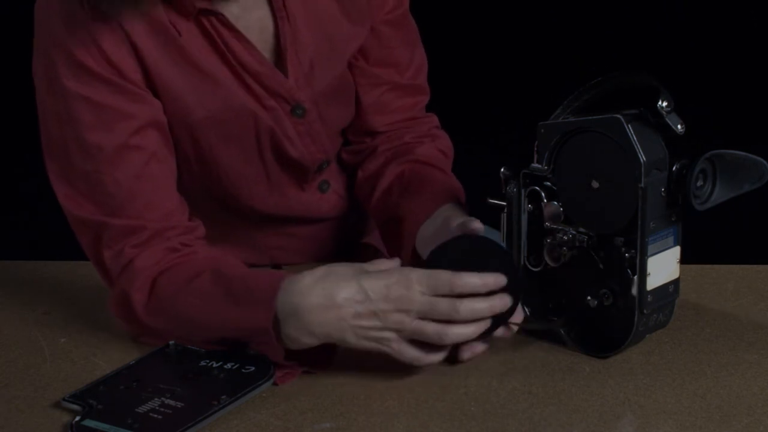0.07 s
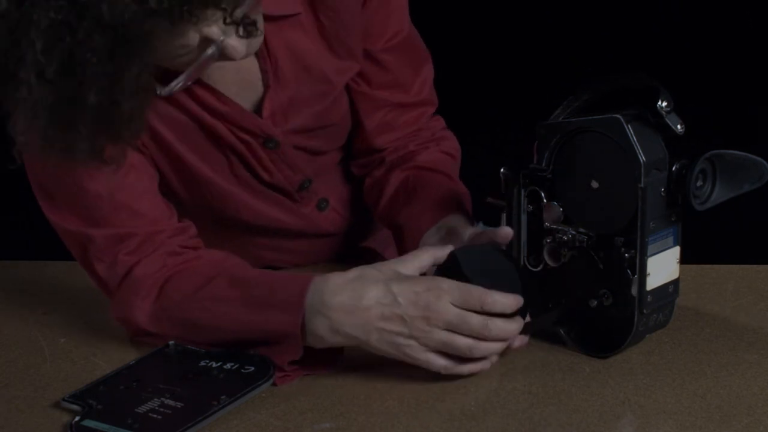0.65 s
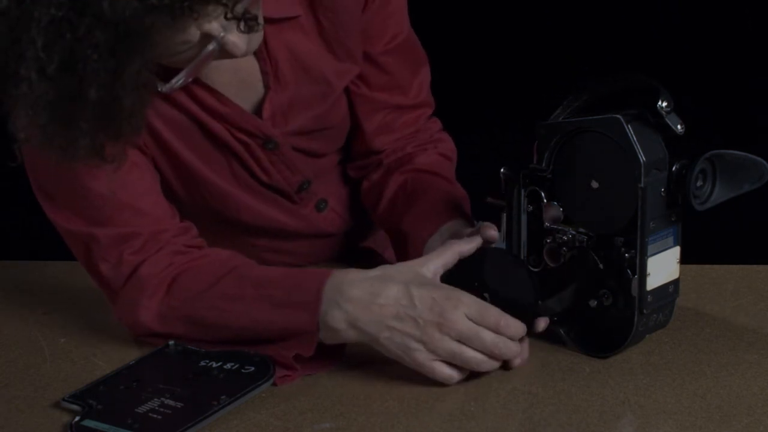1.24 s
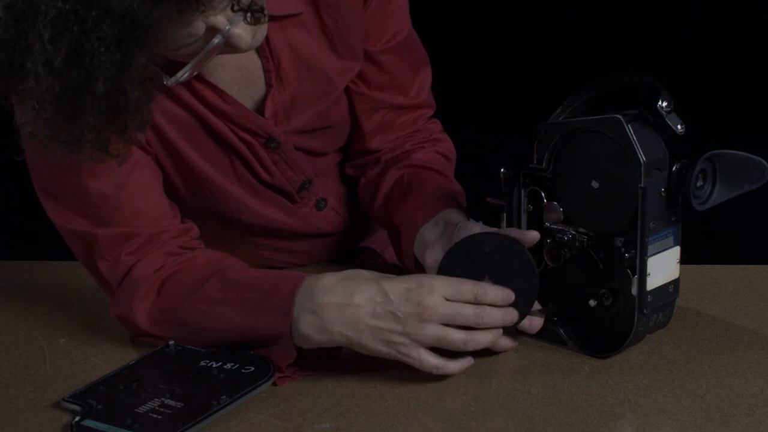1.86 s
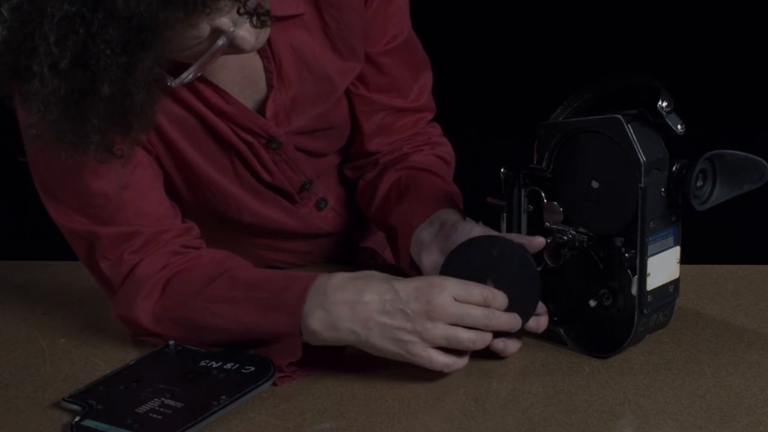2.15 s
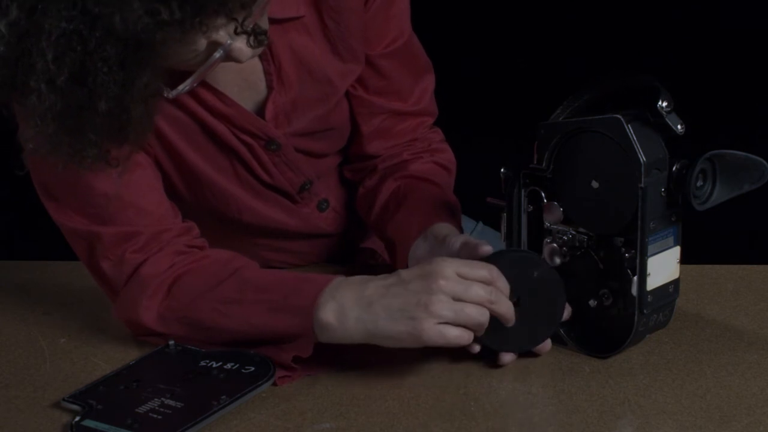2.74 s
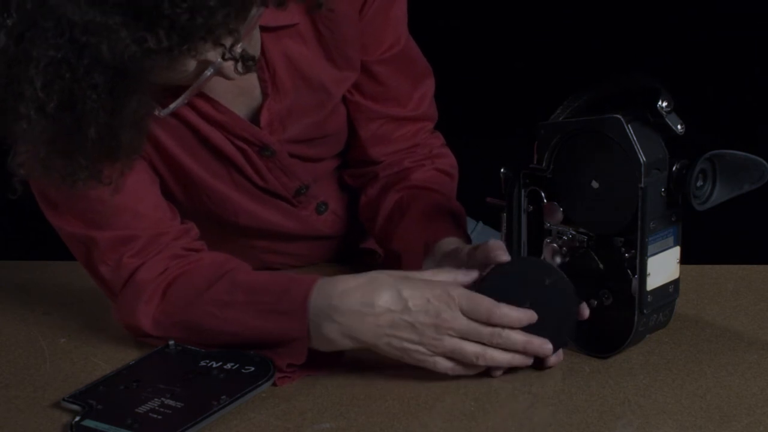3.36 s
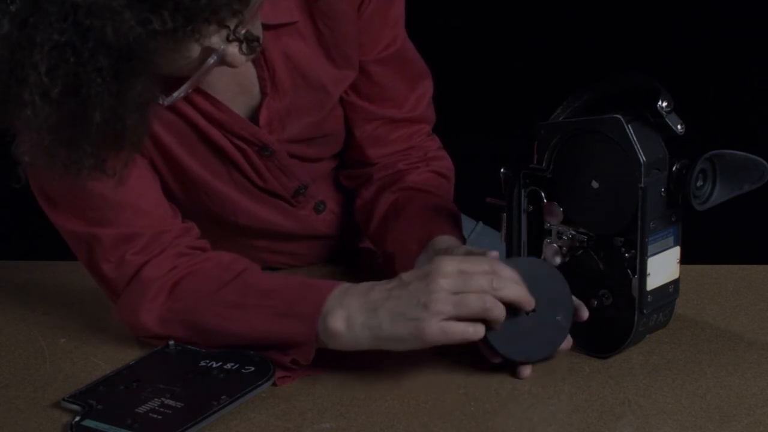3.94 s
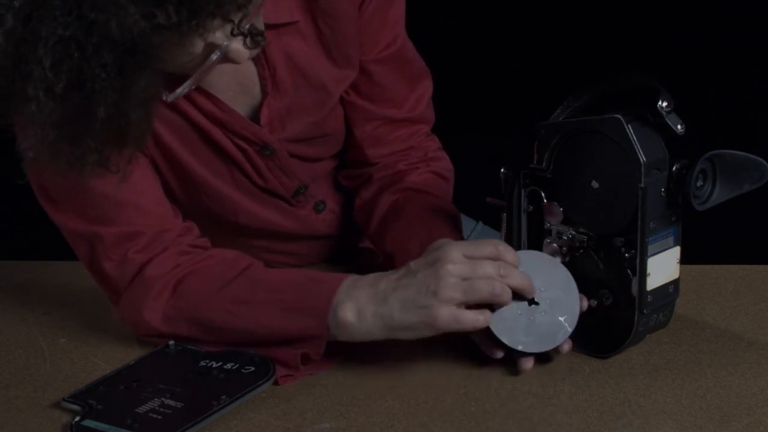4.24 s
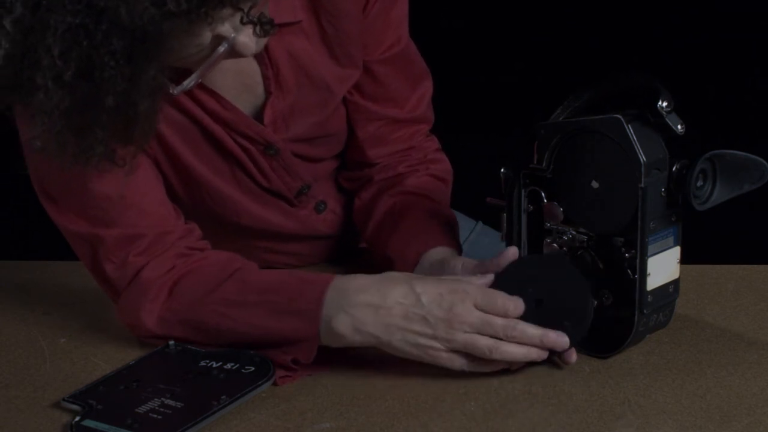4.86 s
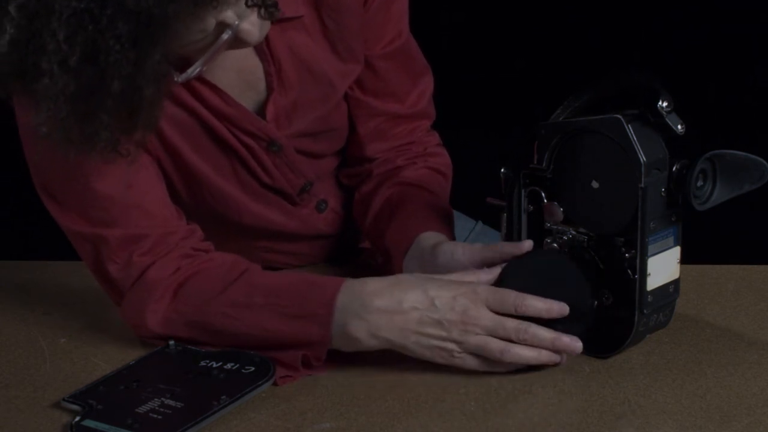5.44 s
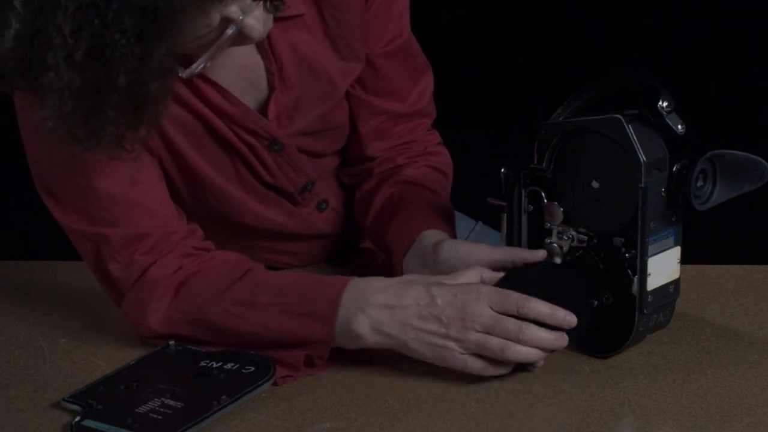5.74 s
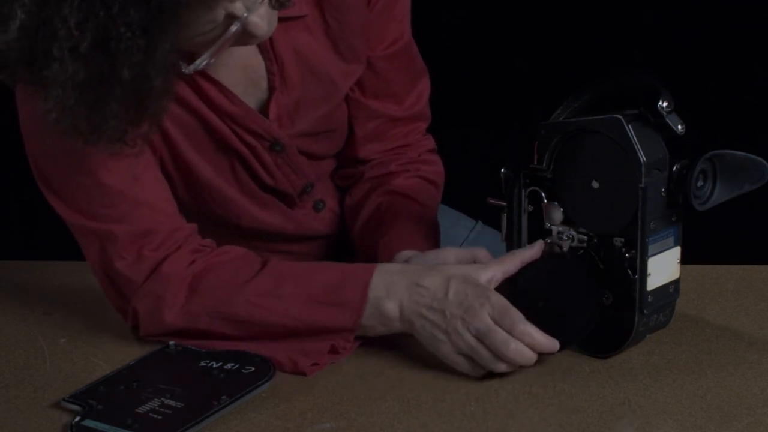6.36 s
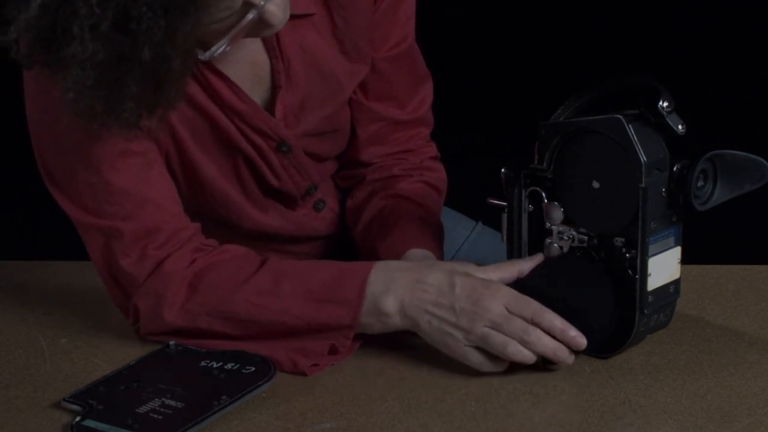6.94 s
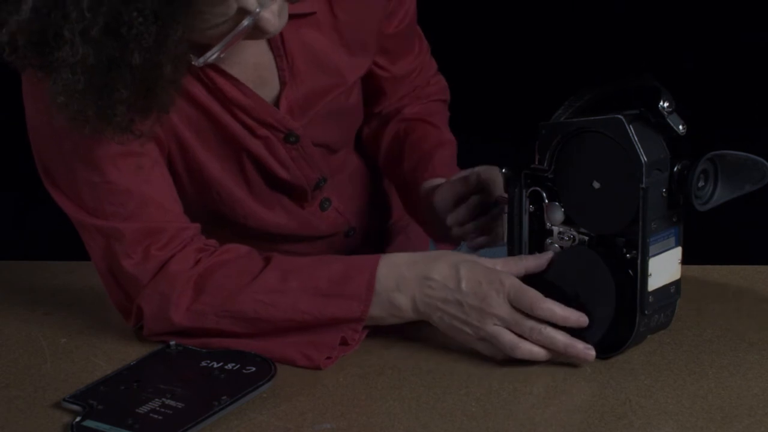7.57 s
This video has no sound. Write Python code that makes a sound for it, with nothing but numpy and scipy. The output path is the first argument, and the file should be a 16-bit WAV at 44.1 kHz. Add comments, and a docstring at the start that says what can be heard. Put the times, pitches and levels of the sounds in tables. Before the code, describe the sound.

Film is wound by hand onto a small metal spool, giving soft rubs, tiny high squeaks and light ticks as its edge flicks the rims. Near the end the spool knocks a few times against the hollow body of a film camera on a table and scrapes into place. The sounds are small and close, in a quiet room with a steady low hum and rumble of air.

```python
"""Film squeaks and rubs as hands wind it onto a metal spool, then fit the spool into a cine camera.
The tightening turns stick and slip in short chirps, and the film edge ticks against ringing flanges.
The spool then knocks and scrapes into the camera, exciting the resonances of the hollow case as it
stands on a table. Behind it all lie the hum of motors and the rumble of air in a quiet room."""
import sys
import numpy as np
from scipy import signal
from scipy.fft import rfft, irfft
from scipy.io import wavfile

SR = 44100
rng = np.random.default_rng(int(sys.argv[2]) if len(sys.argv) > 2 else 0)


def inscribe(sig):
    """Save sig as 16-bit PCM at rate SR to the path in sys.argv[1].

    A 1-D sig is mono; a 2-D sig holds one channel per row.
    Samples are clipped to [-1, 1] before scaling.
    """
    pcm = np.round(np.clip(np.atleast_2d(sig).T, -1, 1) * 32767)
    wavfile.write(sys.argv[1], SR, pcm.astype(np.int16))


N = 335102
TIME = np.arange(N) / SR

# Spectra of film contact and of finger contact. Each row: frequency in Hz, relative level in dB.
FILM_SPECTRUM = [(1000, -16), (2200, -12), (3300, -4), (4300, -0.5), (5600, 2), (7200, -1), (10000, -9.5),
                 (14500, -8), (16500, -29.5)]
FINGER_SPECTRUM = [(300, -18.5), (650, -3.5), (1200, 10), (2500, 13), (4000, 5.5), (8000, -32)]
# Modes of the hand-damped flanges and of the hollow case.
# Each row: frequency in Hz, bandwidth in Hz, relative lift in dB.
FLANGE_MODES = [(4952, 60, 7), (5330, 70, 0), (5740, 86.5, 9.5), (6970, 82, 15.5), (8820, 190, 7),
                (11080, 38, 6), (14050, 130, 9)]
CASE_MODES = [(575, 55, 11), (1840, 80, 10), (2010, 55, 11), (2860, 110, 5), (4100, 120, 4), (4860, 100, 2),
              (5520, 120, 8), (6150, 120, 3), (6950, 100, 6)]


def squeaks(edge_s=0.0035, sag_octaves_per_s=4.9, judder_hz=520, judder_db=3.8, scatter_db=0.6):
    """Stick-slip friction: film catches and lets go thousands of times a second, driving the flanges."""
    # Each row: start in seconds, length in seconds, slip rate in Hz, level in dB, unevenness from 0 to 1.
    chirps = [(0.69, 0.042, 5090, -33.0, 0.11), (0.725, 0.016, 4340, -34, 0.03),
              (0.765, 0.0067, 4160, -33.5, 0.01), (1.3137, 0.0068, 4560, -31.5, 0.13),
              (1.3253, 0.013, 4973, -34.5, 0.31), (1.428, 0.0078, 7750, -40.5, 0.04),
              (2.08, 0.0084, 5020, -49, 0.13), (2.466, 0.034, 4600, -55.5, 0.09),
              (2.7843, 0.009, 4004, -41.5, 0.04), (2.8567, 0.0068, 5340, -33, 0.1),
              (2.881, 0.0083, 5500, -31, 0.06), (2.9, 0.0051, 5930, -23.5, 0.04),
              (3.832, 0.01, 7200, -32.5, 0.5), (4.33, 0.0075, 4085, -35.5, 0.05),
              (4.34, 0.0094, 3960, -36.5, 0.07), (4.351, 0.0053, 3460, -33.5, 0.2),
              (4.364, 0.0079, 3100, -39.5, 0.06), (4.431, 0.024, 2430, -56, 0.12),
              (4.475, 0.021, 2810, -51, 0.07), (4.495, 0.011, 2880, -43.5, 0),
              (4.509, 0.0204, 2820, -46.5, 0.07), (4.534, 0.0081, 3455, -44, 0.34),
              (4.884, 0.0038, 6910, -32.5, 0.08), (4.904, 0.011, 4330, -39, 0.08),
              (5.752, 0.021, 2730, -37, 0.09), (5.78, 0.015, 2980, -42.5, 0.07),
              (5.8, 0.014, 3020, -45.5, 0.06), (5.831, 0.0091, 2550, -39, 0.11),
              (5.851, 0.014, 2984, -39, 0.09), (5.866, 0.0132, 3390, -36.5, 0.06),
              (5.89, 0.0095, 3310, -41, 0.07), (6.14, 0.012, 3600, -49.5, 0.31),
              (6.16, 0.0075, 3290, -41, 0.11), (6.47, 0.011, 4580, -37, 0.15),
              (6.838, 0.0084, 3840, -46.5, 0.07), (7.047, 0.0097, 3880, -50.5, 0.13)]
    out, spool = np.zeros(N), resonant_body(FILM_SPECTRUM, FLANGE_MODES, lift_db=-4)
    for start, length, hz, db, uneven in chirps:
        t = TIME[:int(length * SR)]
        wander, grip, grit = rng.standard_normal((3, 8192))[:, :len(t)]
        gate = np.sin(np.pi / 2 * np.minimum(np.minimum(t, length - t) / edge_s, 1)) ** 2
        uneven = np.hypot(uneven, 0.02)  # even the cleanest chirp wavers
        sag = 2 ** (sag_octaves_per_s * (length / 2 - t))  # the slip rate sinks as the pull eases
        slip_hz = hz * (1 + uneven * unit_rms(lowpass(wander, 1100))) * sag
        phase = 2 * np.pi * np.cumsum(slip_hz) / SR
        slips = sum(np.sin(k * phase) / k ** 0.52 for k in range(1, int(SR / 2 / hz) + 1))
        grip = unit_rms(lowpass(grip, 600))
        judder = np.sin(2 * np.pi * np.cumsum(judder_hz * (1 + grip / 2)) / SR)  # rough slips surge
        pressure = undb(min(uneven * 10, 1) * (scatter_db * grip + judder_db * judder))
        force = (slips + 0.45 * np.sqrt(uneven) * grit) * gate * pressure
        chirp = signal.fftconvolve(force, spool)
        add(out, start, undb(db) * chirp * np.sqrt(len(t)) / np.linalg.norm(chirp))
    # The film creeps faintly before and after it lets go.
    start, length, _, db, _ = np.transpose(chirps)
    creep_speed = strokes(start + length / 2, length + 0.014, db - 21)
    creep = friction(2000, spread_db=2.8, smooth=0.5) * creep_speed
    return out + convolve(creep, spool)


def rubs(fidget_db=4, fidget_hz=10):
    """Sliding friction: film hisses over film and excites the flanges while fingers drag on the spool."""
    # Each row: middle in seconds, length in seconds, relative treble level in dB, midrange offset in dB.
    slides = [(0.016, 0.026, -51, -19.5), (0.385, 0.076, -64, -4), (0.557, 0.033, -51, -14),
              (0.936, 0.13, -68.5, -20.5), (1.077, 0.019, -61.5, -4), (1.708, 0.018, -61.5, -16),
              (1.827, 0.0095, -55.5, -11), (1.885, 0.027, -56.5, -12), (2.236, 0.12, -77.5, -11),
              (2.531, 0.034, -47, -10), (2.621, 0.029, -48.5, -2.5), (2.833, 0.023, -57.5, -13),
              (3.122, 0.0079, -61.5, -21), (3.467, 0.031, -70.5, -15.5), (3.688, 0.018, -65.5, -0.5),
              (3.835, 0.013, -35.5, -11), (3.975, 0.062, -57.5, -8), (4.245, 0.08, -68.5, 3.5),
              (4.552, 0.0125, -53.5, -3), (4.667, 0.0156, -53, -8.5), (4.846, 0.0054, -56, -5.5),
              (5.628, 0.046, -62.5, -3), (5.67, 0.0088, -45, -22), (5.726, 0.0054, -47, -13.5),
              (6.09, 0.033, -72.5, 0)]
    # Faint rustle between the strokes. Each row: time in seconds, relative level in dB.
    rustle_levels = [(0.0, -78.5), (0.95, -75), (1.2, -85), (1.48, -64), (2.0, -75), (3.1, -69.5),
                     (3.35, -76.5), (3.94, -73), (4.44, -70), (5.25, -74.5), (5.76, -66), (6.2, -62.5),
                     (6.3, -74), (7.6, -66)]
    # Film sliding on film. Each row: frequency in Hz, relative level in dB.
    hiss_spectrum = [(1500, -11), (3000, -3.5), (5000, 4.5), (7000, -2), (9500, -9), (12500, -18),
                     (15500, -10.5)]
    middle, length, db, midrange_db = np.transpose(slides)
    fidget = unit_rms(lowpass(rng.standard_normal(N), fidget_hz))
    rustle = undb(np.interp(TIME, *np.transpose(rustle_levels)) - 8 + fidget_db * fidget)
    film_speed = strokes(middle, length, db - 2.5) + rustle
    scratch = moving_contact(friction(2200, spread_db=2.6, smooth=0.55) * film_speed)
    hiss = convolve(scratch, resonant_body(hiss_spectrum, FLANGE_MODES, lift_db=-2))
    finger_speed = strokes(middle, length, db + midrange_db - 1) + undb(-9) * rustle
    drag = friction(1300, spread_db=2.4, smooth=0.5) * finger_speed
    return hiss + moving_contact(convolve(drag, colour(FINGER_SPECTRUM)))


def ticks(flutter_s=0.013, flutter_db=-12):
    """Impact excitation: the film edge flicks a flange with a ringing snap, fingers tap with a duller knock,
    and once the spool touches the camera just before it knocks."""
    # Each row: time in seconds, relative level in dB, midrange offset in dB. # The row at 6.975 s is the
    # spool's first light touch just before its knock at 6.983 s.
    flicks = [(2.1026, -40.5, -9), (2.2774, -47, -9), (3.084, -42, -39), (3.7735, -40, -1),
              (3.7998, -28.5, -11.5), (4.048, -35, -11), (4.1099, -39.5, -12), (4.2263, -32, -12.5),
              (4.257, -40, -15), (4.2796, -30.5, -36), (5.013, -42.5, -14.5), (5.0625, -45.5, -2.5),
              (5.172, -63.5, 3.5), (5.401, -52, 3), (5.454, -55, 4), (5.55, -45.5, -2.5),
              (5.576, -48, -1.5), (6.975, -42, -5), (7.216, -36, -18)]
    out, dull = np.zeros(N), colour(FINGER_SPECTRUM)
    bright = resonant_body(FILM_SPECTRUM, FLANGE_MODES, lift_db=-1)
    for start, db, midrange_db in flicks:
        retouch = start + flutter_s * rng.uniform(0.85, 1.5)  # the edge swings back once
        for at, strength_db in ((start, db), (retouch, db + flutter_db)):
            snap = undb(-7) * convolve(impact(rise_s=0.0028, decay_s=0.002), bright)
            tap = undb(midrange_db - 10) * convolve(impact(rise_s=0.0024, decay_s=0.0032), dull)
            add(out, at - 0.0015, undb(strength_db) * (snap + tap))
    return out


def knocks(spot_q=12, rebound_s=0.0185, rebound_db=-18):
    """Impact and rebound: the spool strikes the camera, ringing the struck spot and shaking the case."""
    # Each row: time in seconds, relative level in dB, lower, middle and upper resonance in Hz,
    # high-pass corner in Hz, thump relative to the clack in dB.
    blows = [(6.3813, -25, 583, 2960, 5300, 202, -11.5), (6.5027, -25.5, 1950, 2430, 5370, 197, -8),
             (6.5149, -34, 567, 1930, 6200, 150, 5), (6.5989, -31, 1930, 3040, 6300, 300, -5),
             (6.9829, -21.5, 3770, 5600, 8500, 2320, -46), (7.466, -23, 680, 2500, 4270, 940, -44)]
    # Metal meeting metal. Each row: frequency in Hz, relative level in dB.
    metal_spectrum = [(300, -12), (650, 1.5), (1300, 7), (1600, -11), (2500, 1), (4200, 0.5), (5600, 3),
                      (7500, -1.5), (11000, -6), (16000, -7.5)]
    # The case on the table. Each row: frequency in Hz, relative level in dB, 60 dB decay time in seconds.
    thump_modes = [(243.6, -1.5, 0.24), (268, -5, 0.043), (332, -5, 0.062), (402, -1, 0.043),
                   (560, 3, 0.02), (638, -6.5, 0.081)]
    out, thump = np.zeros(N), modal_ring(thump_modes)
    metal = resonant_body(metal_spectrum, CASE_MODES, lift_db=-7)
    for start, db, lower_hz, middle_hz, upper_hz, corner_hz, thump_db in blows:
        rings = ((lower_hz, 6), (middle_hz, 8), (upper_hz, 8))
        spot = metal + sum(undb(lift_db) * resonance(metal, hz, hz / spot_q) for hz, lift_db in rings)
        spot = highpass(spot, corner_hz)
        for at, strength_db in ((start, db), (start + rebound_s, db + rebound_db)):
            force = undb(strength_db + 1) * impact(rise_s=0.00012, decay_s=0.0016)
            add(out, at, unit_rms(convolve(force, spot)) * np.std(force))
            add(out, at, thump * np.linalg.norm(force) * undb(thump_db))
    return out


def scrapes(seating_s=6.715, seating_rise_s=0.57, seating_db=-63, seating_tilt_db=-13, spot_q=8):
    """Friction drives a cavity: the spool is shoved, then turned steadily, against its chamber wall."""
    # Each row: middle in seconds, length in seconds, relative level in dB, tilt towards the treble in dB,
    # resonance of the rubbed spot in Hz.
    shoves = [(6.502, 0.036, -34, -3, 2250), (6.605, 0.013, -40, 3, 596), (6.83, 0.047, -51.5, -15, 1010),
              (7.205, 0.024, -42, 2.5, 1740), (7.299, 0.039, -39, 2, 2140), (7.543, 0.017, -58, 7, 1320)]
    # The spool grinding on the wall. Each row: frequency in Hz, relative level in dB.
    grind_spectrum = [(200, 2), (550, -2.5), (850, -2), (2000, -2), (3600, -4), (5500, -0.5), (7000, -8),
                      (7600, -11.5), (16000, -22)]
    middle, length, db, tilt_db, _ = np.transpose(shoves)
    turning = undb(seating_db) * np.sqrt(np.clip((TIME - seating_s) / seating_rise_s, 0, 1))
    shoving = strokes(middle, length, db + tilt_db / 2 - 5)
    grit = friction(1300, spread_db=2.6, smooth=0.5)
    catches = friction(1100, spread_db=2.6, smooth=0.4)
    grind = grit * np.hypot(shoving, turning * undb(seating_tilt_db / 2))
    drag = lowpass(catches * turning * undb(-seating_tilt_db / 2), 980)
    for middle, length, db, tilt_db, hz in shoves:
        speed = strokes([middle], [length], [db - tilt_db / 2])
        drag += resonance(catches * speed, hz, hz / spot_q)
    return convolve(moving_contact(grind) + drag, resonant_body(grind_spectrum, CASE_MODES, lift_db=-4))


def friction(catches_per_s, spread_db, smooth):
    """Surface roughness: tiny catches of random size stand out from a smooth hiss."""
    catches = (rng.random(N) < catches_per_s / SR) * rng.standard_normal(N)
    catches *= undb(spread_db * np.minimum(rng.exponential(size=N), 4))
    return unit_rms(unit_rms(catches) + smooth * rng.standard_normal(N))


def strokes(middles, lengths, levels_db):
    """Envelope of sliding speed: strokes swell and die away, adding in power where they overlap."""
    power, t = np.zeros(N), TIME[:SR] - 0.5
    for middle, length, db in zip(middles, lengths, levels_db):
        swell = np.exp(-np.abs(t / (2 * length))) / (1 + (2 * t / length) ** 2) ** 2
        add(power, middle - 0.5, undb(2 * db) * swell)
    return np.sqrt(power)


def moving_contact(x, shifts_per_s=24, depth_db=4):
    """Time-varying resonance: a moving contact favours now one band, now another."""
    out, knots = 0, np.arange(0, N / SR + 1, 1 / shifts_per_s)
    for k, hz in enumerate(np.geomspace(500, 14000, num=18)):
        sway = np.interp(TIME, knots, undb(depth_db * rng.standard_normal(len(knots))))
        out += (-1) ** k * sway * resonance(x, hz, hz / 8)
    return unit_rms(out) * np.std(x)


def impact(rise_s, decay_s):
    """Contact chatter: a noise burst whose envelope peaks near one."""
    t = TIME[:SR // 20]
    envelope = (1 - np.exp(-t / rise_s)) ** 2 * np.exp(-t / decay_s)
    burst = envelope * rng.standard_normal(len(t))
    return unit_energy(burst) * np.linalg.norm(envelope) / envelope.max()


def resonant_body(spectrum, modes, lift_db):
    """Impulse response of a body: narrow resonances stand out from a broad spectrum and ring on."""
    direct = np.pad(colour(spectrum), (0, SR // 5))
    ringing = sum(undb(db + lift_db) * resonance(direct, hz, width) for hz, width, db in modes)
    return unit_energy(direct + ringing)


def modal_ring(modes):
    """Modal superposition: a struck body sounds as a sum of decaying sinusoids."""
    t = TIME[:SR // 2]
    return unit_energy(sum((-1) ** k * undb(db - 60 * t / t60) * np.sin(2 * np.pi * hz * t)
                           for k, (hz, db, t60) in enumerate(modes)))


def afterring(x, t60_s=0.55):
    """Sympathetic resonance: thin metal sings on faintly wherever a sound meets one of its modes."""
    # Lightly damped modes of the metal. Each entry: frequency in Hz.
    modes_hz = [2480, 4118, 4237, 4307, 4948, 5198, 5790, 5836, 5904, 8024]
    return undb(-35) * convolve(x, modal_ring([(hz, 0, t60_s) for hz in modes_hz]))


def room(x, early_db, early_s, low_t60_s=0.45, high_t60_s=0.2):
    """Reverberation: early reflections off table and body, then a tail that loses its treble first."""
    t = TIME[:SR // 2]
    dull = lowpass(rng.standard_normal(len(t)), 3800) * undb(-60 * t / low_t60_s)
    bright = rng.standard_normal(len(t)) * undb(-60 * t / high_t60_s)
    early_boost = 1 + undb(early_db) * np.exp(-t / early_s)
    return convolve(x, unit_energy((dull + bright) * (t > 0.002) * early_boost))


def hum(waver=0.027, drift_cycles=0.13):
    """Beating: the tones of two motors at nearly the same speed pass in and out of phase."""
    # Each row: frequency in Hz, rms level in dB.
    tones = [(23.93, -58), (57.5, -63), (59.1, -60), (118.1, -66), (119.8, -70), (295.45, -78)]
    out, knots = 0, np.linspace(0, N / SR, num=24)
    for hz, db in tones:
        swell, drift = (np.interp(TIME, knots, rng.standard_normal(len(knots))) for _ in range(2))
        phase = 2 * np.pi * (hz * TIME + drift_cycles * drift)
        out += np.sqrt(2) * undb(db) * (1 + waver * swell) * np.sin(phase)
    return out


def air():
    """Broadband flow noise: moving room air rumbles, with a faint hiss in the treble."""
    # Each row: frequency in Hz, relative spectral density in dB.
    air_spectrum = [(12, 1), (22, 10.5), (50, -11), (85, -6), (118, -2), (140, -4), (210, -12),
                    (330, -16.5), (500, -23), (1000, -33), (2500, -40.5), (6000, -52.5), (10000, -43.5),
                    (16000, -45.5)]
    noise = irfft(rfft(rng.standard_normal(N)) * gains(air_spectrum, N), N)
    return undb(-57.5) * unit_rms(noise)


def colour(spectrum, size=1024):
    """Minimum-phase impulse response of a spectrum, found by folding its cepstrum."""
    cepstrum = irfft(np.log(gains(spectrum, size)))
    cepstrum[1:size // 2] *= 2
    cepstrum[size // 2 + 1:] = 0
    return unit_energy(irfft(np.exp(rfft(cepstrum))))


def gains(spectrum, size):
    """Gain at each Fourier bin, interpolated in decibels over log frequency."""
    hz, db = np.transpose(spectrum)
    bin_hz = np.arange(size // 2 + 1) * SR / size
    return undb(np.interp(np.log(bin_hz + 1), np.log(hz), db))


def resonance(x, hz, width_hz):
    """Damped resonator with a gain of one at its centre."""
    return signal.lfilter(*signal.iirpeak(hz, hz / width_hz, fs=SR), x + 1e-18)


def lowpass(x, hz):
    """Second-order treble roll-off."""
    return signal.sosfilt(signal.butter(2, hz, fs=SR, output="sos"), x)


def highpass(x, hz):
    """First-order bass roll-off."""
    return signal.sosfilt(signal.butter(1, hz, "high", fs=SR, output="sos"), x)


def convolve(x, response):
    """Linear filtering by an impulse response."""
    return signal.fftconvolve(x, response)[:len(x)]


def add(track, start_s, sound):
    """Superpose a sound on a track from a given time on."""
    start = int(start_s * SR)
    skip = max(-start, 0)
    part = sound[skip:max(N - start, 0)]
    track[start + skip:start + skip + len(part)] += part


def undb(db):
    """Decibels to amplitude ratio."""
    return 10 ** (np.asarray(db) / 20)


def unit_rms(x):
    """Scale to an rms of one."""
    return x / np.sqrt(np.mean(x ** 2) + 1e-20)


def unit_energy(x):
    """Scale to an energy of one."""
    return x / np.linalg.norm(x)


def scene():
    """Mid-side stereo: the sources are central; mainly the treble of the reflections spreads a little."""
    handling = squeaks() + rubs() + ticks() + knocks() + scrapes()
    reverberation = undb(-12) * room(handling, early_db=4, early_s=0.04)
    mid = handling + afterring(handling) + reverberation + hum() + air()
    reflections = room(handling, early_db=16, early_s=0.036)
    side = undb(-13) * highpass(reflections, 9000) + undb(-32) * reflections
    side += undb(-93) * rng.standard_normal(N) + undb(-45) * air()
    return np.array([mid + side, mid - side])


def record(dry, top_hz=15900):
    """Band limiting: a steep elliptic low-pass removes the highest treble."""
    return signal.sosfilt(signal.ellip(8, 0.2, 70, top_hz, fs=SR, output="sos"), dry)


dry = scene()
out = record(dry)
inscribe(out)
```